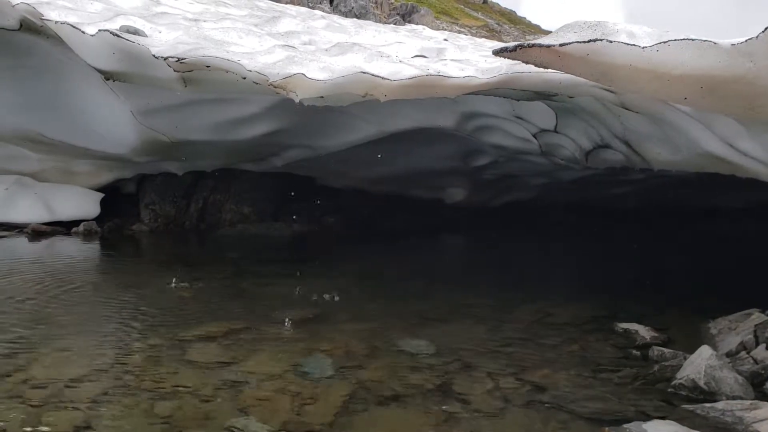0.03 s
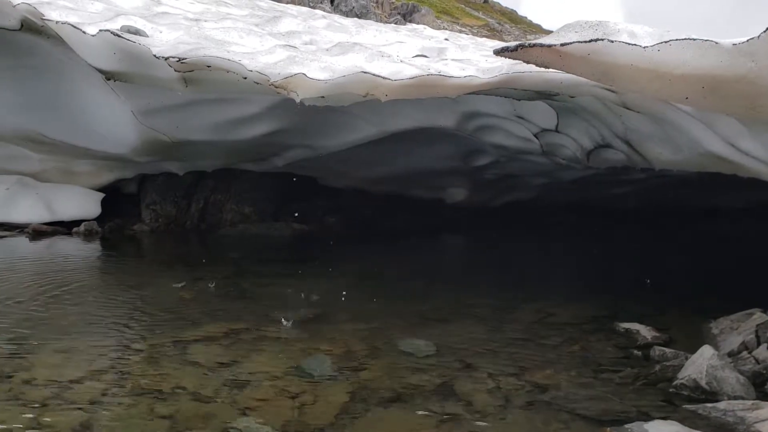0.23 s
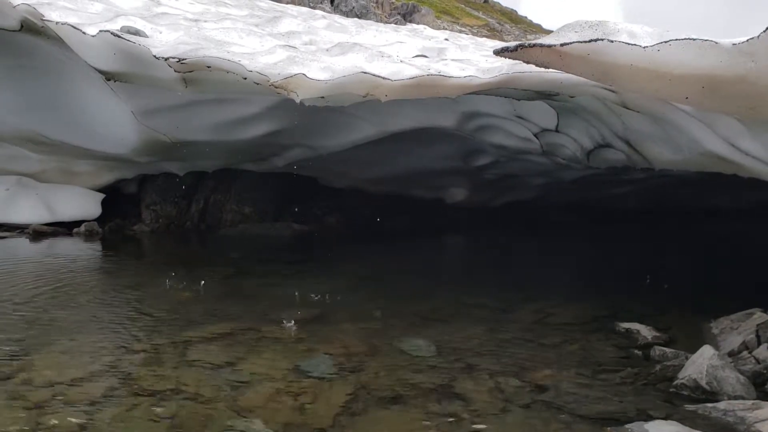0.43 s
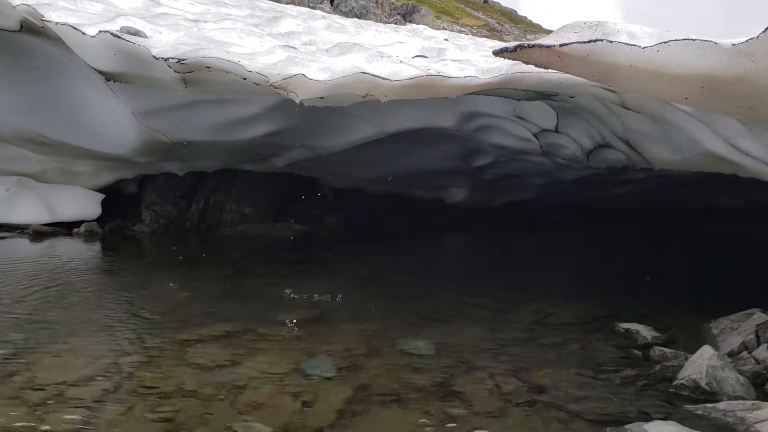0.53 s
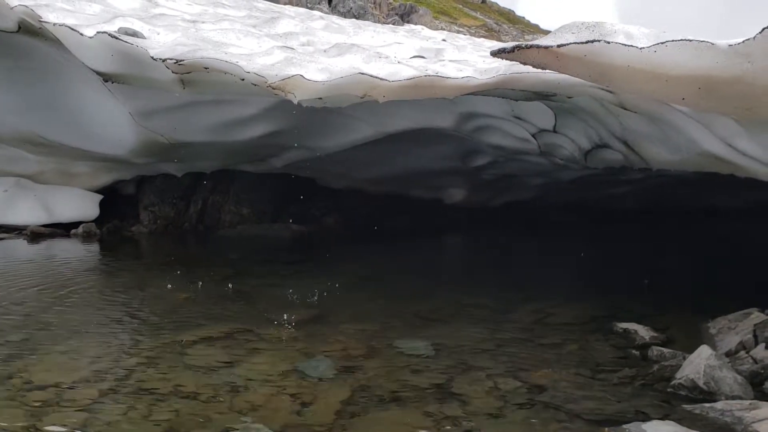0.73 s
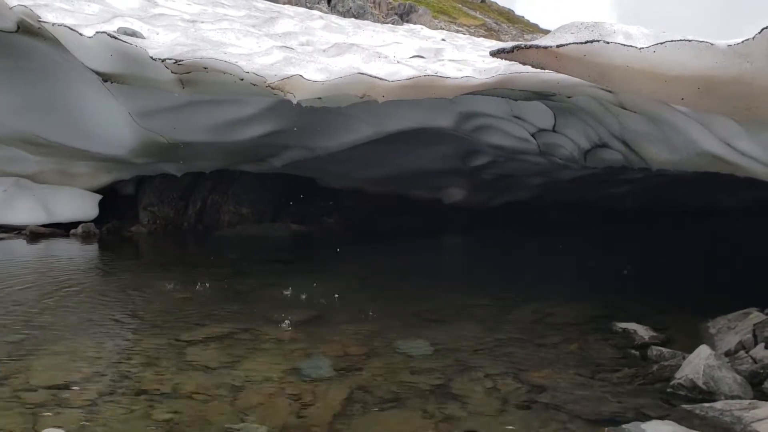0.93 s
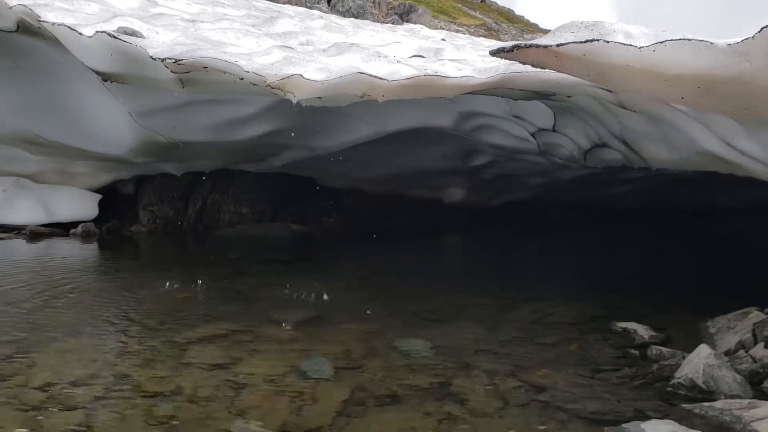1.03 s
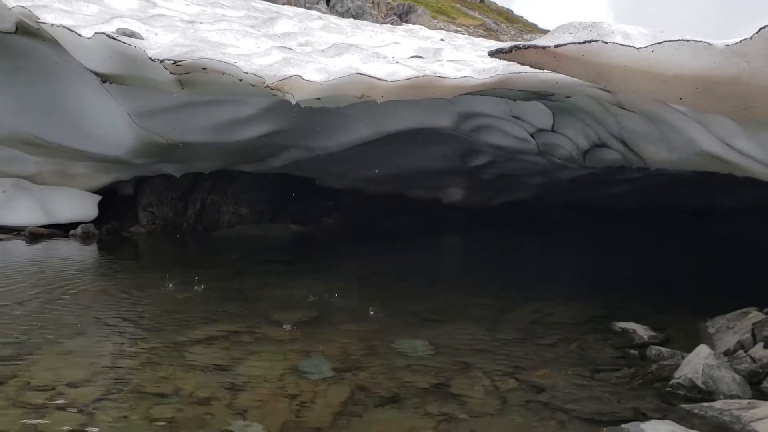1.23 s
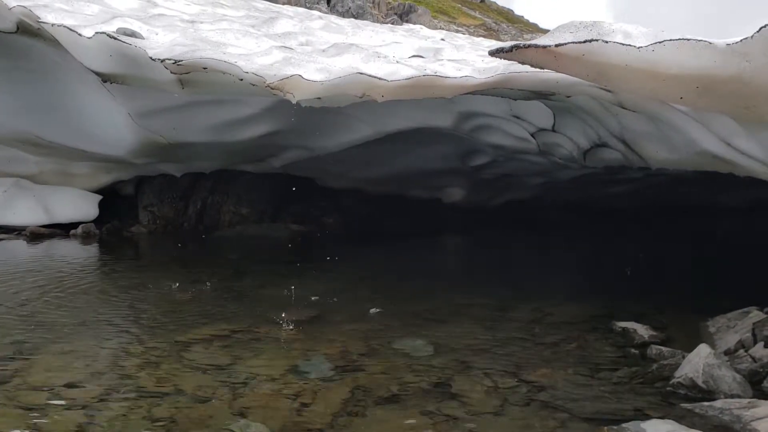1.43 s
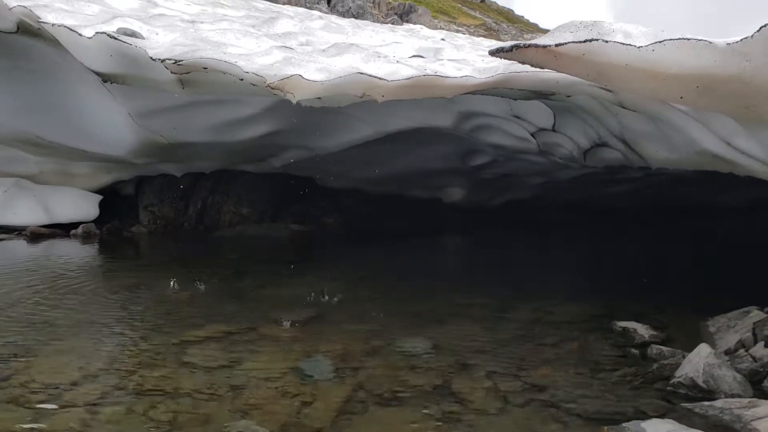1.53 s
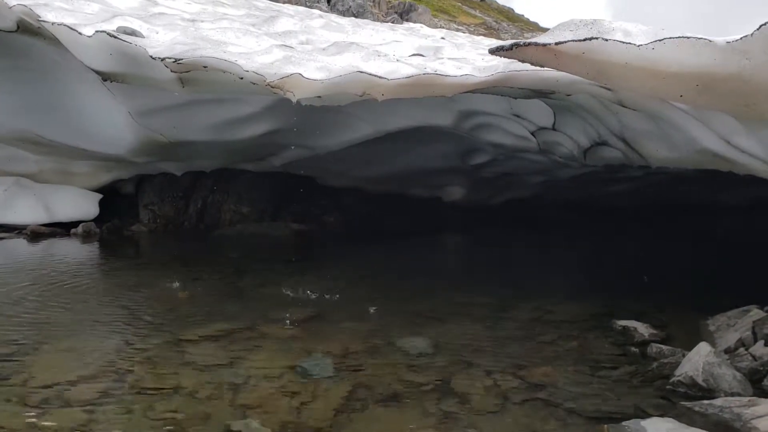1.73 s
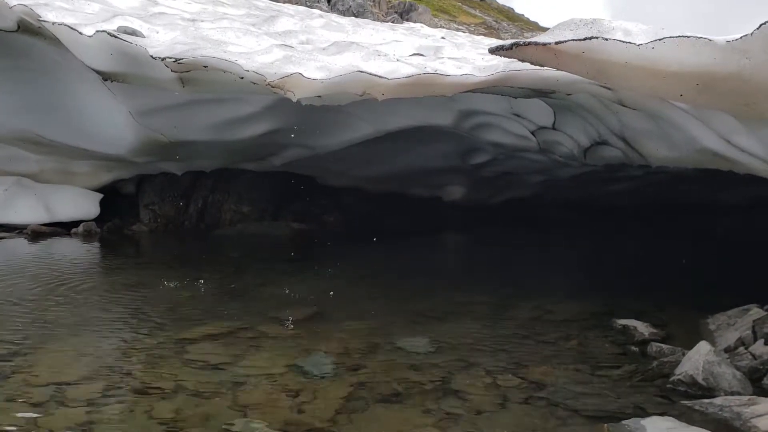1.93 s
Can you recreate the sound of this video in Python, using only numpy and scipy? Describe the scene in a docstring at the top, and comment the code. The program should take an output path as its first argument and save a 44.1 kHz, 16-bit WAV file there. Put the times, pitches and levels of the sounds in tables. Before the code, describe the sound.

Water drips and splashes lightly into a shallow pool, with wind rumbling on the microphone.

```python
"""Dripping snow cave

Meltwater drips from the roof into a shallow pool: two sharp smacks close by, many small splashes and
some ringing air bubbles further in, over the patter and hiss of distant drops. The hollow echoes softly.
A light breeze rumbles on the two microphone openings (ports), with a few low thumps, and each port
colours the sound of the water in its own way."""
import sys
import numpy as np
from scipy import signal
from scipy.fft import rfft, irfft, next_fast_len
from scipy.io import wavfile
from scipy.ndimage import uniform_filter1d, map_coordinates

SR = 44100
rng = np.random.default_rng(int(sys.argv[2]) if len(sys.argv) > 2 else 0)


def bounce(signal):
    """Save signal as a 16-bit WAV file at the path given by the first command-line argument."""
    frames = np.transpose(np.atleast_2d(signal))
    limited = np.clip(frames, -1, 1)
    pcm = np.round(limited * 32767).astype(np.int16)
    wavfile.write(sys.argv[1], SR, pcm)


N = 88200
TOP_HZ = 15800
PORT_LAG_S, LAG_SPREAD_S = 0.00014, 0.00004  # how much later a drop reaches the right port


def amp(db):
    """Turn decibels into a number to multiply by."""
    return 10 ** (np.asarray(db) / 20)


def unit(x):
    """Scale a signal so its average strength (rms) is 1."""
    return x / np.sqrt(np.mean(x ** 2) + 1e-20)


def along(points, hz):
    """Read between the rows of a (frequency, value) table, spacing octaves evenly."""
    f, values = np.transpose(points)
    return np.interp(np.log(hz + 1), np.log(f + 1), values)


def wobble(rate):
    """A smooth curve through `rate` random points a second."""
    points = rng.standard_normal(int(N * rate / SR) + 4)
    return map_coordinates(points, [np.arange(N) * rate / SR])


def jitter(t, samples):
    """A quick random tremble: noise smoothed over a number of samples."""
    return unit(uniform_filter1d(rng.standard_normal(len(t)), size=samples))


def filtered(x, response):
    """Turn each frequency in x up or down by response(hz)."""
    n = x.shape[-1]
    padded = next_fast_len(n + n // 2)
    return irfft(rfft(x, padded) * response(np.fft.rfftfreq(padded, 1 / SR)), padded)[..., :n]


def noise(spectrum):
    """Noise of strength 1, with its balance of low and high set by a table."""
    return unit(filtered(rng.standard_normal(N), lambda hz: amp(along(spectrum, hz))))


def fade(t, t60):
    """Die away by 60 dB in t60 seconds, the fade time."""
    return np.exp(-np.log(1000) * t / t60)


def add_drop(track, s, sound):
    """Mix a drop in at time s; its random place on the pool delays one port against the other."""
    lag = PORT_LAG_S + LAG_SPREAD_S * rng.standard_normal()
    for channel, start in zip(track, (s - lag / 2, s + lag / 2)):
        part = channel[max(round(start * SR), 0):][:len(sound)]
        part += sound[:len(part)]


def bubble(t, hz, t60, rise_per_s=0.94, attack_s=0.00081):
    """A fading note that rises as the bubble nears the surface."""
    note = np.sin(2 * np.pi * hz * (t + rise_per_s * t * t / 2))
    return note * fade(t, t60) * (1 - np.exp(-t / attack_s))


def hiss(low_hz, shape):
    """A bright burst of noise whose loudness follows `shape`."""
    band = signal.butter(4, [low_hz, TOP_HZ], "band", fs=SR, output="sos")
    burst = signal.sosfilt(band, rng.standard_normal(len(shape)) * shape)
    return burst * np.linalg.norm(shape) / np.linalg.norm(burst)


# Tone of the distant water: f/Hz, relative level/dB
WASH_TONE = [(150, 8), (600, -10), (1050, -4), (1600, 0.5), (2100, -7.5), (2600, -3.5), (5000, 1.5),
             (8000, -0.5), (12000, 2.5), (16000, 5.5)]
def wash(level_db=-57, patchy_db=3, smooth_above_hz=5000, swell_db=1):
    """Far drops and trickles blur into a patchy hiss, different on each side."""
    hz, _, slices = signal.stft(np.array([noise(WASH_TONE), noise(WASH_TONE)]), SR, nperseg=512)
    depth_db = patchy_db / (1 + (hz[:, None] / smooth_above_hz) ** 2)
    patches = uniform_filter1d(rng.standard_normal(slices.shape[1:]), size=6, axis=0)  # blur in pitch
    patches = unit(uniform_filter1d(patches, size=3, axis=1))  # and in time
    water = signal.istft(slices * amp(depth_db * patches), nperseg=512)[1][:, :N]
    return unit(water) * amp(level_db + swell_db * wobble(rate=12.65))


def steady(x):
    """Even out the swells in a noise."""
    power = uniform_filter1d(uniform_filter1d(x * x, size=1100), size=1100)
    return x / np.sqrt(np.abs(power) + 1e-9)


# Strength of the breeze on each port: t/s, level/dB
LEFT_GUSTS = [(0, -48), (.14, -47.5), (.26, -46.5), (.3, -42), (.35, -29), (.41, -56), (.46, -36),
              (.49, -50), (.53, -42.5), (.7, -53), (.77, -49), (.89, -68), (.95, -39.5), (1, -48),
              (1.08, -31), (1.17, -48.5), (1.31, -37.5), (1.45, -51), (1.7, -46.5), (1.77, -44.5),
              (1.84, -54), (2, -41)]
RIGHT_GUSTS = [(0, -87), (.04, -58), (.1, -43.5), (.17, -47), (.23, -26.5), (.28, -43.5), (.33, -35.5),
               (.38, -73), (.44, -61), (.48, -38.5), (.54, -34), (.59, -50), (.66, -34.5), (.74, -44),
               (.78, -31), (.85, -36), (.88, -54), (.915, -46), (.945, -22), (1.005, -32), (1.067, -28),
               (1.1, -34), (1.21, -37.5), (1.26, -31.5), (1.4, -35), (1.45, -52.5), (1.49, -31.5),
               (1.55, -50), (1.59, -32.5), (1.77, -63), (1.82, -40), (2, -51)]
# Tone of the wind's rumble and of its small swirls: f/Hz, relative level/dB
RUMBLE_TONE = [(15, -102), (30, -9), (55, 4), (90, 1.5), (130, -2.5), (200, -16), (300, -30), (500, -44),
               (1000, -70), (3000, -100)]
SWIRL_TONE = [(40, -57), (90, 4), (135, 1), (240, -4), (400, -22), (700, -41.5), (1500, -73), (4000, -92)]
def breeze(gusts, rumble_db=-2, strong_gust_db=-18.5, strong_swirl_db=-25.5, swirl_growth=1.463):
    """Wind rumbles on a port; stronger gusts shed more small, higher-sounding swirls of air."""
    gust_db = np.interp(np.arange(N) / SR, *np.transpose(gusts))
    rumble = amp(gust_db + rumble_db) * steady(noise(RUMBLE_TONE))
    swirl_db = strong_swirl_db + swirl_growth * (gust_db - strong_gust_db)
    return rumble + amp(swirl_db) * steady(noise(SWIRL_TONE))


def patter(per_s=500, softest_db=-58, spread_db=1, middle_hz=8600, pitch_spread=0.604, fade_cycles=5.8):
    """Many faint droplets tick at random times and pitches."""
    when, size, radius, angle, place = rng.random((int(per_s * N / SR), 5)).T[:, :, None]
    bell_curve = np.sqrt(-2 * np.log(radius)) * np.cos(2 * np.pi * angle)  # random, mostly near 0
    hz = np.clip(middle_hz * np.exp(pitch_spread * bell_curve), 800, 15000)
    k = np.arange(SR // 100)
    db = softest_db + spread_db * np.minimum(-np.log(size), 4)
    droplets = amp(db) * np.sin(2 * np.pi * hz * k / SR) * fade(k / SR, fade_cycles / hz)
    starts = [when * N, when * N + 2 * place * PORT_LAG_S * SR]  # left, right
    return np.array([np.bincount((start.astype(int) + k).ravel(), droplets.ravel(), N)[:N]
                     for start in starts])


def far_drips(per_s=70, level_db=-52.5, spread_db=3.5, middle_hz=4558, pitch_spread=0.283, fade_cycles=77):
    """Drips deep in the cave ring tiny bubbles at random times and pitches."""
    out, t, count = np.zeros((2, N)), np.arange(SR // 12) / SR, int(per_s * N / SR)
    for when, (size, pitch) in zip(rng.random(count), rng.standard_normal((count, 2))):
        hz = min(middle_hz * np.exp(pitch_spread * pitch), SR / 3)
        add_drop(out, when * N / SR, amp(level_db + spread_db * size) * bubble(t, hz, fade_cycles / hz))
    return out


# How long the hollow rings, from low to high: f/Hz, fade time/s
ECHO_FADES = [(300, 0.21), (1200, 0.36), (5000, 0.17), (15000, 0.35)]
def cave_echo(x, delay_s=0.00067, build_s=0.014, block_s=0.1):
    """The snow roof and the water send back a short, blurred echo."""
    out, block = np.zeros((2, N)), round(block_s * SR)
    for start in range(0, N, block):  # a fresh echo per block keeps it from ringing at fixed pitches
        hz, t, slices = signal.stft(rng.standard_normal((2, SR // 3)), SR, nperseg=256)
        build = 1 - np.exp(-np.maximum(t - delay_s, 0) / build_s)
        shape = build * fade(t, along(ECHO_FADES, hz)[:, None])
        tail = signal.istft(slices * shape, SR, nperseg=256)[1]
        tail /= np.linalg.norm(tail[0])
        echo = signal.fftconvolve(x[:, start:start + block], tail, axes=1)[:, :N - start]
        out[:, start:start + echo.shape[1]] += echo
    return out


def spray_ticks(per_s=41, softest_db=-48.5, spread_db=2, low_hz=5000, t60=0.0046):
    """Fine spray falls back on the pool in dry, bright ticks."""
    out, t = np.zeros((2, N)), np.arange(SR // 100) / SR
    for when, size in rng.random((int(per_s * N / SR), 2)):
        db = softest_db + spread_db * min(-np.log(size), 2)
        add_drop(out, when * N / SR, amp(db) * hiss(low_hz, fade(t, t60)))
    return out


# Small splashes on the pool: t/s, level/dB, f/Hz, pitch width/octaves, fade time/s
SMALL_SPLASHES = [(0.075, -49, 6210, 0.23, 0.042), (0.13, -41.5, 8400, 3, 0.058),
                  (.206, -42, 8750, .8, 0.016), (.262, -44.5, 6200, 0.7, 0.051),
                  (0.31, -44.5, 5500, 0.54, 0.078), (.325, -35, 4730, 0.18, 0.019),
                  (0.326, -35.5, 7100, 0.43, .02), (0.362, -50, 3910, 0.34, 0.064),
                  (.406, -65, 6000, 2.3, 0.023), (.463, -41, 3760, 2.7, .03), (.542, -47, 5750, 0.25, .05),
                  (.531, -54.5, 3300, 0.22, 0.065), (0.563, -48, 4180, 0.36, 0.035),
                  (0.617, -44, 4240, 0.4, 0.048), (0.711, -43, 5740, 0.35, 0.043),
                  (0.777, -51.5, 3070, .5, 0.068), (.794, -37.5, 3200, .9, 0.016),
                  (.821, -43.5, 5060, 0.13, 0.048), (0.828, -42, 7550, 0.77, 0.036),
                  (.895, -59, 7200, 0.24, 0.073), (.942, -49, 5150, 0.33, 0.047),
                  (0.958, -49, 4620, 0.23, 0.034), (1.035, -41, 5860, 0.3, 0.018),
                  (1.048, -44.5, 6250, 1.5, .05), (1.063, -36.5, 4640, 0.55, 0.023),
                  (1.116, -45, 3900, 1.6, 0.075), (1.212, -51.5, 4830, .4, 0.078),
                  (1.264, -42.5, 5870, 3.2, 0.071), (1.287, -44, 4630, 0.7, 0.042),
                  (1.36, -50, 5900, 0.3, 0.033), (1.411, -43.5, 3670, 0.69, 0.035),
                  (1.454, -49, 4890, 0.2, 0.034), (1.523, -47, 4660, 0.44, 0.026),
                  (1.544, -37.5, 6600, 2.5, 0.0098), (1.565, -40, 4630, 0.39, 0.017),
                  (1.589, -38.5, 6000, 2.1, 0.021), (1.606, -42.5, 5830, 0.16, 0.014),
                  (1.653, -41, 5004, 0.14, 0.032), (1.741, -44.5, 7700, 1.1, 0.046),
                  (1.757, -43, 4140, 0.32, 0.031), (1.874, -44.5, 4080, 0.52, 0.03),
                  (1.93, -48, 6020, 0.16, 0.024), (1.939, -43, 4420, 1.7, 0.03),
                  (1.975, -45, 6800, 0.13, 0.037)]
def splashes(attack_s=0.0014, grain_db=-3.5, ring_gain=0.8, narrow_octaves=0.35):
    """Each splash is a short, grainy burst around its own pitch; narrow ones also ring a tiny bubble."""
    out, t = np.zeros((2, N)), np.arange(SR // 8) / SR
    for s, db, hz, width, t60 in SMALL_SPLASHES:
        grain = amp(grain_db * jitter(t, samples=50))
        shape = fade(t, t60) * (1 - np.exp(-t / attack_s))
        peak = lambda f: (1 + (np.log2((f + 1) / hz) / width) ** 2 / 2) ** -2
        bass_cut = lambda f: f ** 2 / (f ** 2 + 1000 ** 2)
        burst = filtered(rng.standard_normal(len(t)) * grain * shape, lambda f: peak(f) * bass_cut(f))
        burst *= np.linalg.norm(shape) / np.linalg.norm(burst)
        ring = ring_gain / (1 + (width / narrow_octaves) ** 4) * bubble(t, hz, t60)
        add_drop(out, s, amp(db) * (ring + burst))
    return out


# Air bubbles trapped by drops: t/s, level/dB, f/Hz, fade time/s
TRAPPED_BUBBLES = [(.084, -48.5, 2350, 0.018), (0.08, -52, 1190, 0.068), (0.137, -53, 2476, 0.051),
                   (0.137, -51, 1040, 0.035), (0.461, -55, 1715, 0.058), (0.529, -59, 1024, .13),
                   (.262, -57, 2356, 0.079), (.712, -51.5, 1660, 0.053), (.72, -56, 1316, 0.049),
                   (.757, -59, 910, 0.033), (.808, -44.5, 1615, 0.022), (0.839, -69, 1590, 0.037),
                   (1.476, -57, 1257, .06), (.794, -44.5, 1590, 0.043), (1.084, -43, 1300, 0.027),
                   (1.154, -35.5, 2714, 0.016), (1.163, -52.5, 1003, 0.13), (1.182, -48.5, 1146, 0.072),
                   (1.249, -39.5, 2880, 0.015), (1.267, -46.5, 1726, 0.039), (1.377, -49, 2650, 0.042),
                   (1.413, -55, 2550, 0.031), (1.573, -54.5, 2423, 0.051), (1.589, -50.5, 1634, 0.098),
                   (1.639, -53, 954, 0.032), (1.763, -51, 938, 0.042), (1.911, -51, 1264, 0.035),
                   (1.925, -60.5, 2450, .04)]
def plinks(waver_radians=0.3):
    """Drops that trap a larger bubble ring with a slightly unsteady note."""
    out, t = np.zeros((2, N)), np.arange(SR // 5) / SR
    for s, db, hz, t60 in TRAPPED_BUBBLES:
        waver_s = waver_radians * jitter(t, samples=200) / (2 * np.pi * hz)
        add_drop(out, s, amp(db) * bubble(np.maximum(t + waver_s, 0), hz, t60))
    return out


# Low thumps on a port: t/s, half-length/s, level/dB, f/Hz, flutter level/dB, side (0 left, 1 right)
PORT_THUMPS = [(0.227, 0.0074, -24.5, 88, -62, 0.85), (0.357, 0.0061, -22, 147.7, -56, 0.01),
               (.85, 0.004, -33, 151, -50.5, .95), (0.964, 0.015, -26.5, 77.4, -43, 0.91),
               (1.038, 0.0077, -24.5, 230, -41.5, 1), (1.065, 0.012, -17.5, 132, -32, 0.98),
               (1.587, 0.006, -33.5, 119, -51.5, 0.97)]
# Tone of the flutter: f/Hz, relative level/dB
FLUTTER_TONE = [(80, -8), (250, 4.5), (400, -3), (700, -19.5), (1300, -31), (3000, -47)]
def thumps():
    """Short, low thumps with some flutter, from a gust or a drop hitting a port."""
    out, t = np.zeros((2, N)), np.arange(N) / SR
    for s, half_length, db, hz, flutter_db, side in PORT_THUMPS:
        push = amp(db) * np.cos(2 * np.pi * (hz * (t - s) + rng.random()))
        flutter = amp(flutter_db) * noise(FLUTTER_TONE)
        swell = np.exp(-((t - s) / half_length) ** 2 / 2)
        pan = side * np.pi / 2
        out += np.outer([np.cos(pan), np.sin(pan)], swell * (push + flutter))
    return out


# Drops landing close by: t/s, level/dB, bubble f/Hz, bubble level/dB, snap delay/s, snap level/dB
CLOSE_DROPS = [(0.5108, -26, 5680, -40, 0.00085, -19.5), (.6801, -26, 5995, -29.5, 0.0012, -50)]
def smacks(low_hz=4300, snap_low_hz=10800, spray_db=-12.5, grain_db=4):
    """A close drop cracks on the surface, snaps again, rings a tiny bubble and throws spray."""
    out, t = np.zeros((2, N)), np.arange(SR // 5) / SR
    for s, db, hz, ring_db, delay, snap_db in CLOSE_DROPS:
        droplets = unit(amp(grain_db * jitter(t, samples=30)))
        crack = hiss(low_hz, fade(t, t60=0.0029))
        spray = amp(spray_db) * hiss(low_hz, droplets * fade(t, t60=0.078))
        add_drop(out, s, amp(db) * (crack + spray) + amp(ring_db) * bubble(t, hz, t60=0.015))
        add_drop(out, s + delay, amp(snap_db) * hiss(snap_low_hz, fade(t, t60=0.0028)))
    return out


# How much each port boosts or cuts each pitch: f/Hz, level change/dB
LEFT_COLOUR = [(500, 4), (1500, -3), (2100, 0), (2500, 1), (3100, -4.5), (4500, -5), (6000, -3.5),
               (7400, 4), (8800, -5.5), (10000, -3.5), (12700, 5.5), (15600, 0.5)]
RIGHT_COLOUR = [(500, 2), (1500, -4), (2100, -4), (2500, 3.5), (4000, 5), (5600, 11), (6150, 6.5),
                (6750, -10.5), (7400, 1.5), (8200, 1), (9500, -3.5), (11500, -7.5), (13000, -7),
                (15600, -10)]
def port(x, colour, size=2048):
    """A microphone opening makes some pitches louder and others softer."""
    cepstrum = irfft(np.log(amp(along(colour, np.fft.rfftfreq(size, 1 / SR)))))
    # Fold the filter so that it rings only after a sound, never before it.
    cepstrum[1:size // 2] *= 2
    cepstrum[size // 2 + 1:] = 0
    ringing = irfft(np.exp(rfft(cepstrum)))
    return signal.fftconvolve(x, ringing)[:N]


def scene(echo_db=-3, close_send_db=-5):
    """The water and its echo come in through the ports; the breeze and thumps act right on them."""
    on_ports = np.array([breeze(LEFT_GUSTS), breeze(RIGHT_GUSTS)]) + thumps()
    far, close = wash(), smacks()
    drops = splashes() + plinks() + far_drips()
    echo = amp(echo_db) * cave_echo(drops + amp(close_send_db) * close)
    left, right = close + drops + echo + far + patter() + spray_ticks()
    return np.array([port(left, LEFT_COLOUR), port(right, RIGHT_COLOUR)]) + on_ports


def record(dry):
    """Cut away everything higher than TOP_HZ."""
    return filtered(dry, lambda hz: hz < TOP_HZ)


dry = scene()
out = record(dry)
bounce(out)
```